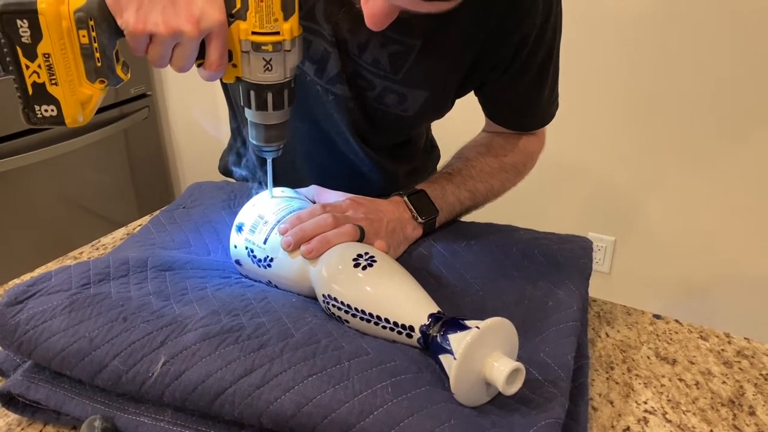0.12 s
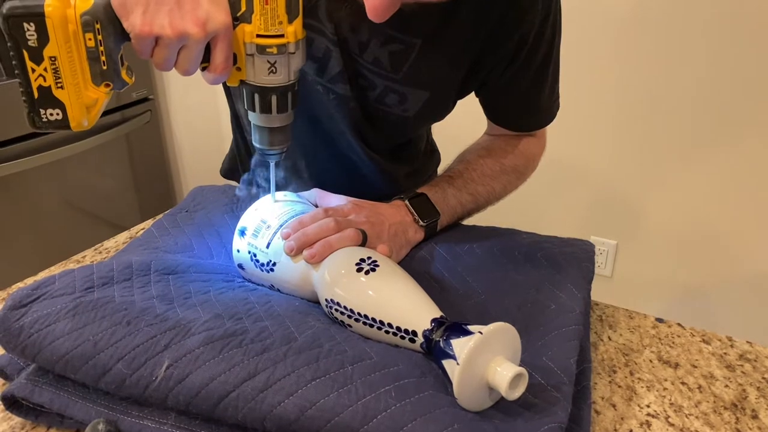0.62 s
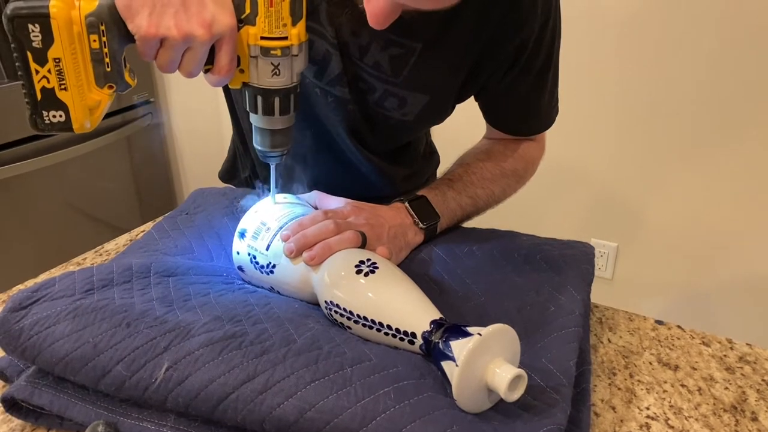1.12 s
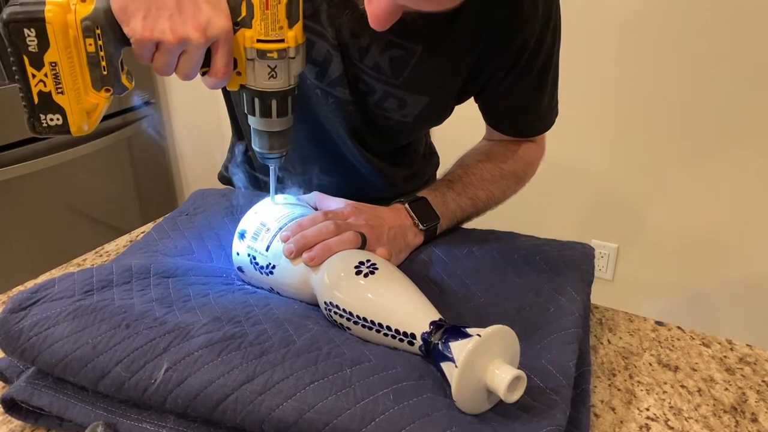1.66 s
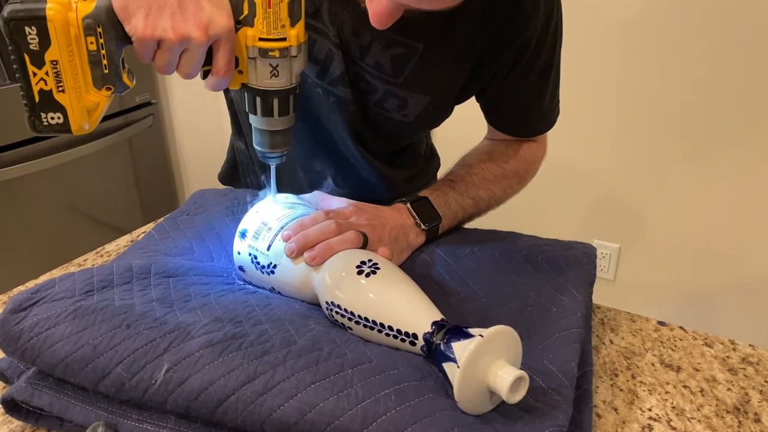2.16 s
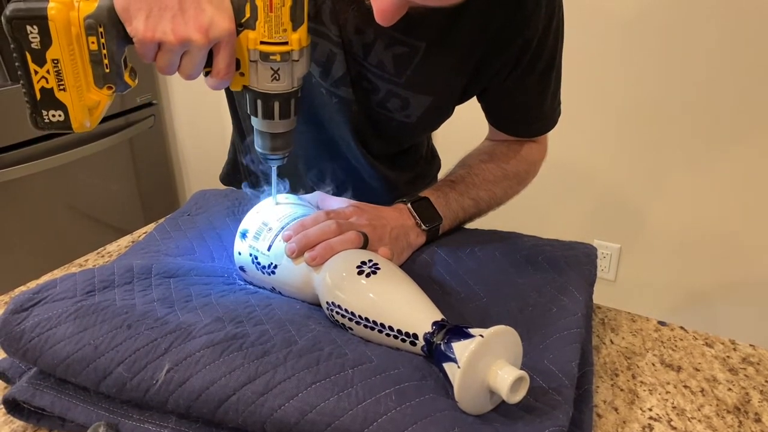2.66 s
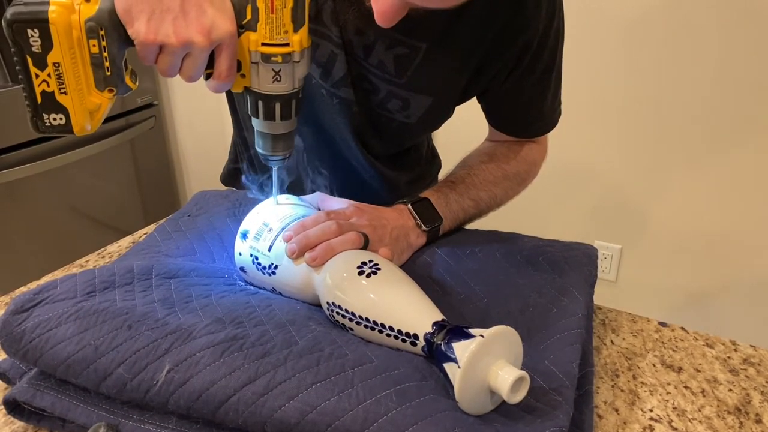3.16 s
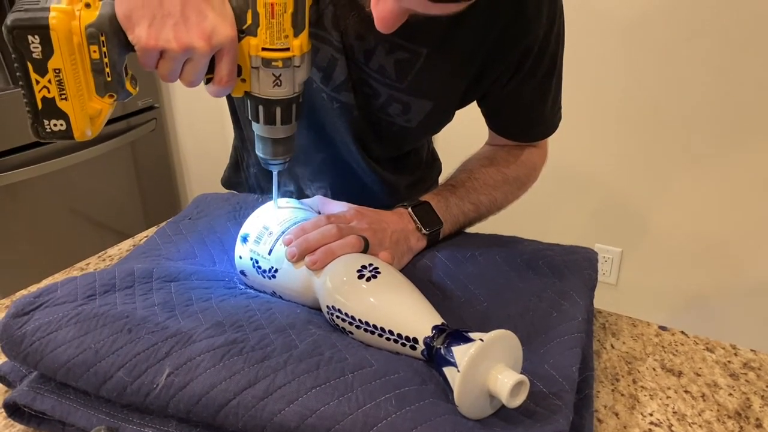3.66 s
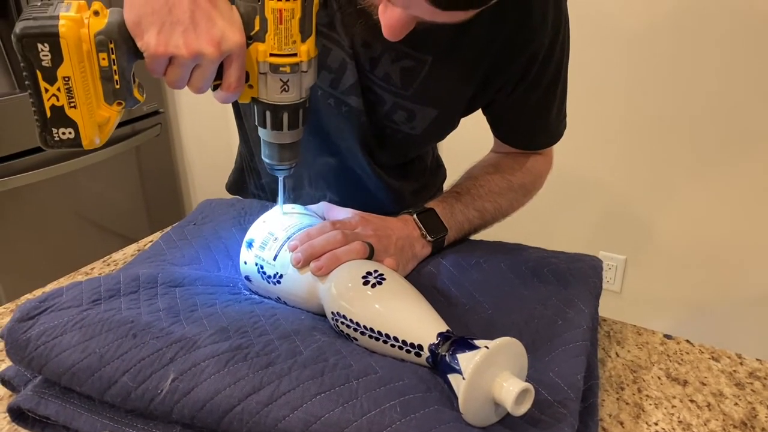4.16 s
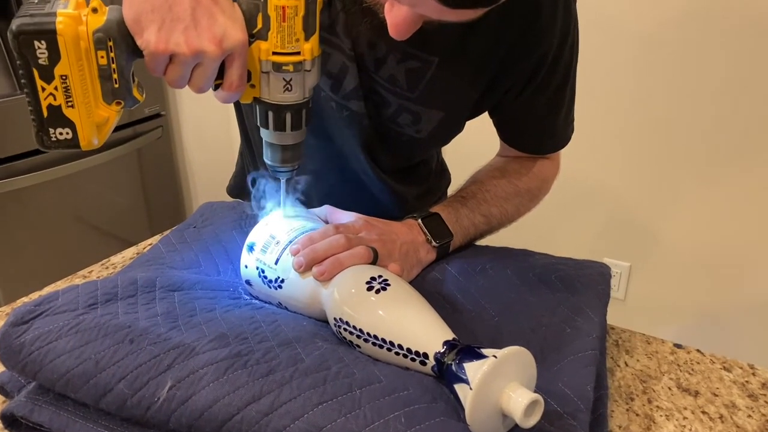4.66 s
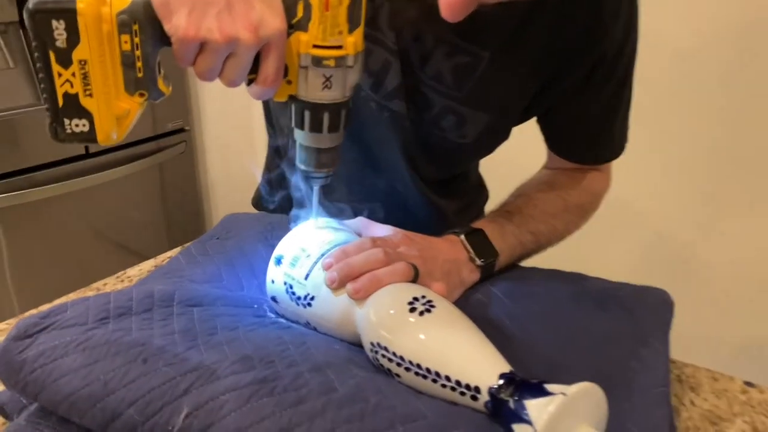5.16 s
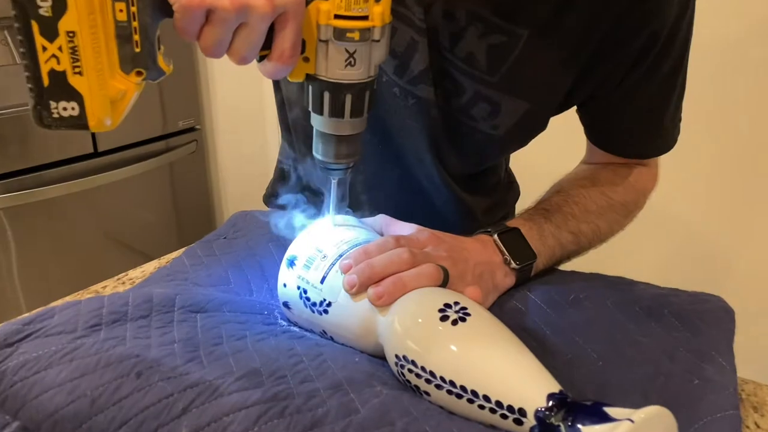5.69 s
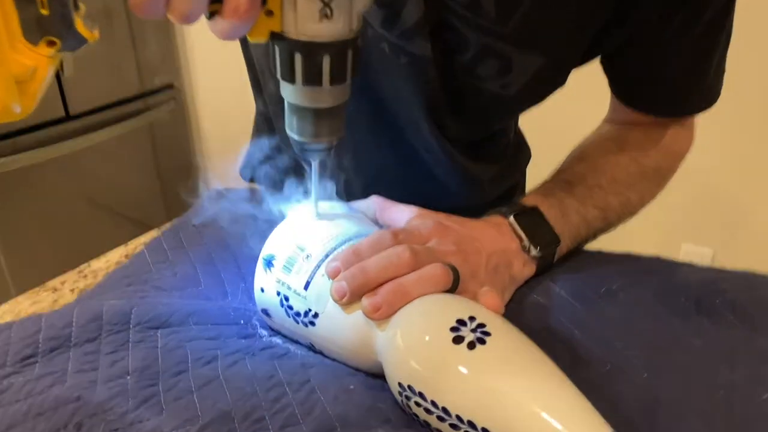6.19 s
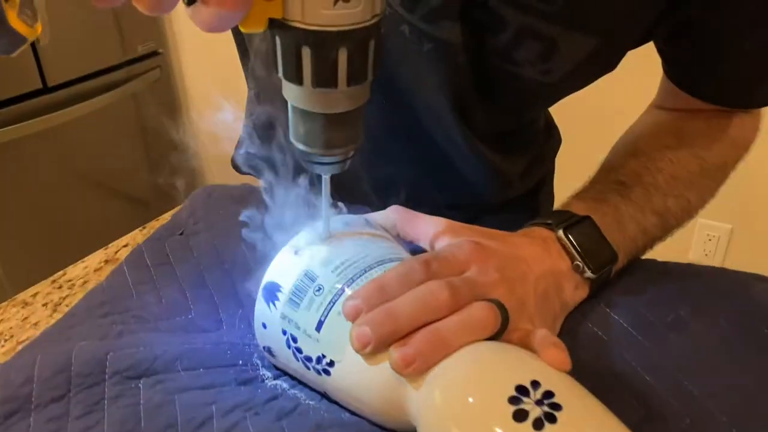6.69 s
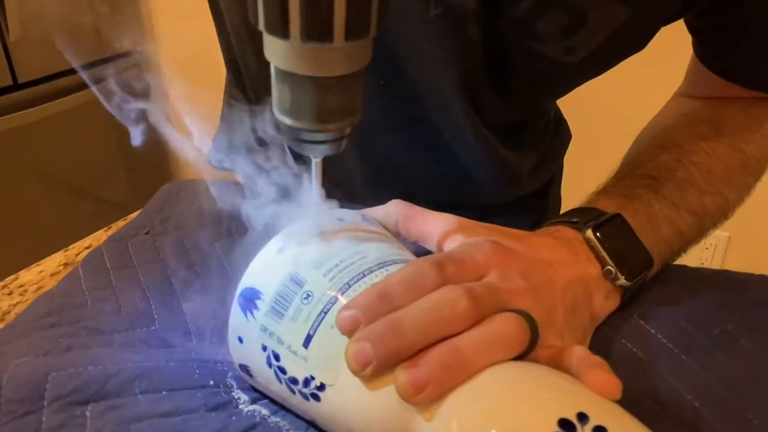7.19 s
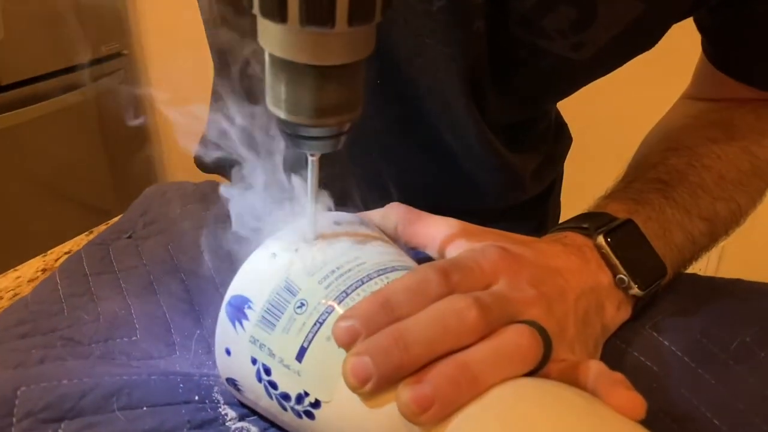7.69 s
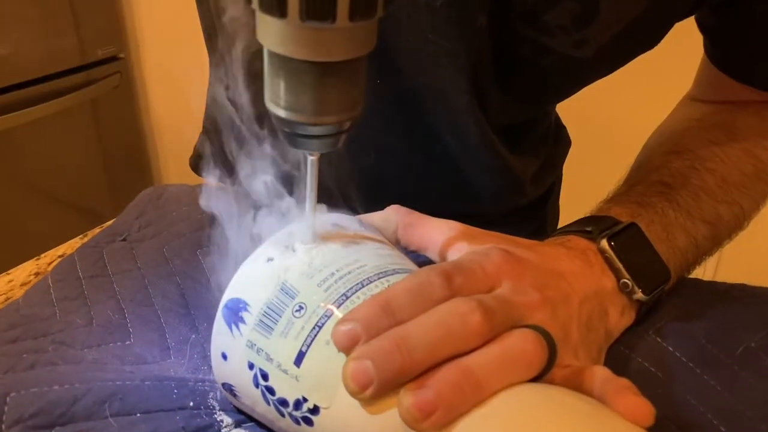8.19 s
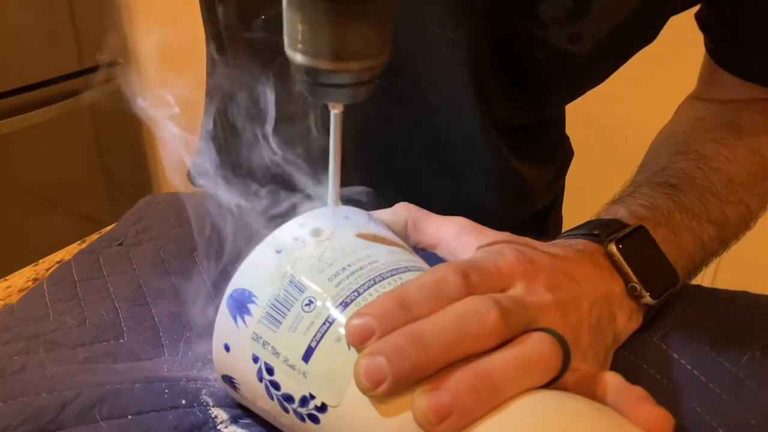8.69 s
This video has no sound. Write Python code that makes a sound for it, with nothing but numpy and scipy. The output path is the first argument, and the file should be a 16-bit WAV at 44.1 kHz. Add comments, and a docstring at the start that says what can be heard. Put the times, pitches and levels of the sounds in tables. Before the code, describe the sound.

A cordless drill grinds grittily into a ceramic bottle, its trigger pumped several times, then held in a harsher scraping hiss until it stops.

```python
"""A cordless drill grinds with a faint gear whine into a ceramic bottle on a folded blanket in a kitchen.
Its trigger is pumped a few times, held again and let go. Dense random clicks of grit are filtered into hiss
and drive resonances of shank, bottle, chuck jaws and gearbox; slower bumps thump into the blanket.
The motor is a set of unsteady sines; ticks and brake clacks are single blows that ring the same kind of modes.
Two microphone ports close by hear it all over the room tail and a quiet hush."""
import sys
import numpy as np
from scipy import signal
from scipy.fft import rfft, irfft
from scipy.io import wavfile
from scipy.ndimage import uniform_filter1d

SR = 44100
rng = np.random.default_rng(int(sys.argv[2]) if len(sys.argv) > 2 else 0)


def makeup_ratio(level_db):
    """Linear amplitude ratio for a level in decibels (20 dB per factor of ten)."""
    decades = np.asarray(level_db, float) / 20
    return 10 ** decades


def unload_wav(signal):
    """Save mono or channel-first audio to the path in sys.argv[1] as 16-bit WAV at rate SR, clipped to [-1, 1]."""
    wavfile.write(
        sys.argv[1],
        SR,
        np.round(np.clip(np.atleast_2d(signal).T, -1, 1) * 32767).astype(np.int16),
    )


N = 389403
T = np.arange(N) / SR


def evened(x):
    """Scales to rms 1."""
    return x / np.sqrt(np.mean(x ** 2) + 1e-20)


def columns(rows):
    """Turns every column after the first (seconds) into a curve over time."""
    s, *rest = np.transpose(rows)
    return [np.interp(T, s, c) for c in rest]


def coloured(x, points):
    """Filters x by a spectrum of (Hz, dB) points and scales the result to rms 1."""
    f, db = np.transpose(points)
    hz = np.fft.rfftfreq(x.shape[-1], 1 / SR)
    gain = makeup_ratio(np.interp(np.log(hz + 1), np.log(f), db))
    return evened(irfft(rfft(x) * gain, x.shape[-1]))


def ring(x, modes):
    """Each mode is a steep resonance (one pole, twice) driven by x and scaled to its own level."""
    out = np.zeros(N)
    for hz, width, db in modes:
        pole = np.exp((2j * np.pi * hz - np.pi * width) / SR)
        rung = signal.lfilter([1], np.poly([pole, pole]), x).real
        out += makeup_ratio(db) * evened(rung)
    return out


def wander(hz):
    """Slow random drift of rms 1: noise smoothed twice over 1/hz seconds."""
    size = int(SR / hz)
    once = uniform_filter1d(rng.standard_normal(N), size)
    return evened(uniform_filter1d(once, size))


# Spectrum of the quiet room. Each row: frequency in Hz, relative density in dB per Hz.
HUSH = [(60, -8), (115, -1.5), (187, -21.5), (305, -6.5), (705, -19), (15500, -52)]


def hush():
    """The quiet room: coloured noise, mostly alike at both ports."""
    common, left, right = rng.standard_normal((3, N))
    both = np.array([common + .5 * left, common + .5 * right])
    return makeup_ratio(-62) * coloured(both, HUSH)


# Room tail by frequency. Each row: frequency in Hz, decay time t60 in seconds, relative level in dB.
ROOM = [(300, .55, -1), (1500, .9, -3), (4000, .68, -5.5), (7500, .58, -9), (12000, .6, -14)]


def kitchen(x):
    """Room tail: taps of random sign, one in every 20 samples, decay at a rate set by their frequency."""
    taps, at = np.zeros(SR), np.arange(200, SR - 20, 20)
    taps[at + rng.integers(0, 20, len(at))] = rng.choice([-1., 1.], len(at))
    hz, t, z = signal.stft(taps, SR, nperseg=256)
    f, *rest = np.transpose(ROOM)
    t60, far_db = (np.interp(hz, f, c)[:, None] for c in rest)
    near = makeup_ratio(4.5 - 60 * t / 0.039)  # counter and wall close by answer first and die fast
    far = makeup_ratio(far_db - 60 * t / t60)
    tail = signal.istft(z * (far + near), SR, nperseg=256)[1]
    return makeup_ratio(-16) * signal.fftconvolve(x, tail / np.linalg.norm(tail))[:N]


# Stereo picture of the ports. Each row: frequency in Hz, likeness 0-1, left over right in dB.
PORTS = [(60, 1, -3), (354, 0.72, -2), (857, 0.66, 2), (1440, 0.43, 0.5), (2460, 0, 1), (3400, 0.56, 0.5),
         (6000, 0.12, 1.5), (7500, 0.87, 0), (8800, 0.8, 1.1), (10000, 0.97, -1.1), (12100, 0.96, 0.5),
         (16000, 0.7, -1)]
# Phase by which the right port leads. Each row: frequency in Hz, lead in radians.
LEAD = [(0, 0), (1000, -.55), (3550, -.85), (4500, -.3), (6300, 0), (8350, 3.14), (12100, 9.42),
        (16000, 15.7)]
# the ports oppose each other here until the microphone nears, and the place slides down as it comes
OPPOSED_HZ, OPPOSED_WIDTH_HZ, OPPOSED_RAD, OPPOSED_SLIDE_HZ = 3073, 198, -2.4, 900
# motor tones reach the ports nearly unscattered; the room tail comes from all sides
TONE_SCATTER, TAIL_SCATTER_RAD = 0.19, 0.29


def scatter_map(shape):
    """Random field of rms 1, smooth over 22 frames in time and 3 bins in frequency."""
    over_time = uniform_filter1d(rng.standard_normal(shape), 22, 1)
    return evened(uniform_filter1d(over_time, 3, 0))


def ports(grind, tones, tail):
    """The phase between the ports, scrambled by drifting scatter that weakens as the hand-held microphone nears."""
    hz, t, z = signal.stft(np.array([grind, tones, tail]), SR, nperseg=1024, noverlap=768)
    f, *rest = np.transpose(PORTS)
    likeness, balance_db = (np.interp(hz, f, c)[:, None] for c in rest)
    distance_share = np.interp(t, [4.5, 6.5], [1.05, .75])
    spread = np.sqrt(-2 * np.log(np.clip(likeness, .05, 1))) * distance_share
    phase, patch = scatter_map(z[0].shape), scatter_map(z[0].shape)

    far = np.interp(t, [5.6, 7.2], [1, 0])
    opposed_hz = OPPOSED_HZ - OPPOSED_SLIDE_HZ * (1 - far)
    opposed = np.exp(-((hz[:, None] - opposed_hz) / OPPOSED_WIDTH_HZ) ** 2) * np.sqrt(far)
    lead = np.interp(hz, *np.transpose(LEAD))[:, None] + OPPOSED_RAD * opposed

    side, heard = np.array([-.5, .5])[:, None, None], 0
    diffuse = spread + TAIL_SCATTER_RAD * np.minimum(hz / 6000, 1)[:, None]
    for part, scatter in zip(z, (spread, TONE_SCATTER * spread, diffuse)):
        turned = np.exp(1j * side * (lead + scatter * phase))
        heard = heard + part * turned * makeup_ratio(-side * (balance_db + 2.6 * scatter * patch))
    return signal.istft(heard, SR, nperseg=1024, noverlap=768)[1][:, :N]


# Chuck speed, held until the next row. Each row: start in seconds, speed in turns per second.
SPEED = [(0, 12.87), (2.1, 11.12), (4.6, 12.91), (5.5, 15.03)]


def chuck_angle():
    """Angle of the chuck in radians: its stepped speed summed over time."""
    s, speed = np.transpose(SPEED)
    first_turn = .94
    turns_per_s = speed[np.searchsorted(s, T, "right") - 1]
    return 2 * np.pi * (first_turn + np.cumsum(turns_per_s) / SR)


TURN = chuck_angle()

# How hard the bit is pushed. Each row: time in seconds, grinding gain in dB, blanket thump in dB over grinding.
PUSH = [(0, -31.5, -21), (1.4, -31, -14), (2.1, -30.5, -13), (2.25, -33.5, -13), (3, -32.5, -6),
        (3.55, -28, -6.5), (3.8, -30.5, -6.5), (4.1, -26.5, -6), (4.55, -30.5, -7.5), (4.88, -38, -9.5),
        (5.06, -30, -9), (5.3, -31, -7.5), (5.46, -28.5, -9), (6.9, -29.5, -9), (8.3, -31.5, -8)]
# The trigger is pumped. Each row: let go in seconds, pulled again in seconds, deepest dip in dB,
# jolt back at the pull in dB, spin-up in seconds.
PUMPS = [(2.199, 2.348, -20.5, 0, 0.065), (2.526, 2.636, -20, 1.5, 0.049), (2.833, 2.922, -20, 4.5, 0.061),
         (3.089, 3.184, -20, 12.5, 0.06), (3.357, 3.405, -21.5, 13, 0.12), (3.596, 3.642, -18, 7.5, 0.11),
         (3.871, 3.954, -22, 13.5, 0.052), (5.322, 5.369, -6, 2.5, 0.034)]


def load():
    """The push on the bit, cut by each let-go and climbing back after each pull: grinding dB, thump dB over it."""
    brake_s, thump_lag_db = 0.036, -7.5  # time constant of the sinking level; the thump returns late
    load_db, thump_db = columns(PUSH)
    for off, on, dip_db, jolt_db, spin_s in PUMPS:
        sinking = (T < on) * (1 - np.exp(-np.maximum(T - off, 0) / brake_s))
        behind = (T >= on) * np.clip(1 - (T - on) / spin_s, 0, 1)
        load_db = load_db + dip_db * sinking + (dip_db + jolt_db) * behind
        thump_db = thump_db + thump_lag_db * np.sqrt(behind)
    return uniform_filter1d(load_db, size=100), uniform_filter1d(thump_db, size=100)


def tone(rows, waver_hz, flutter_db):
    """A sine on a pitch curve, slightly unsteady in pitch and level, silent outside its rows."""
    hz, db, *wobble_hz = columns(rows)
    inside = uniform_filter1d(1. * (T >= rows[0][0]) * (T < rows[-1][0]), 800)
    pitch_hz = hz + sum(wobble_hz) * np.sin(TURN) + waver_hz * wander(84)
    cycles = np.cumsum(pitch_hz) / SR
    level = makeup_ratio(db + flutter_db * wander(30))
    return np.sqrt(2) * inside * level * np.sin(2 * np.pi * cycles)


# Motor whine at full trigger. Each row: time in seconds, gear mesh in Hz, level in dB, once-a-turn wobble in Hz.
WHINE = [(0, 3566, -34, 24), (.96, 3559, -33, 15), (1.0, 3525, -46, 10), (1.2, 3525, -43, 6),
         (1.3, 3548, -34.5, 9), (1.96, 3540, -36.5, 8), (2.08, 3530, -32, 9), (2.15, 3470, -42, 5)]
# Shaft tone of the last long pull. Each row: time in seconds, pitch in Hz, level in dB, once-a-turn wobble in Hz.
SHAFT = [(5.03, 1055, -42, 40), (5.2, 1050, -43.5, 36), (5.3, 1044, -51, 3), (8.3, 1030, -51, 2)]
# The bottle groans when pushed hard. Each row: time in seconds, pitch in Hz, level in dB.
GROAN = [(4.1, 1700, -39), (4.6, 1630, -54), (4.95, 1880, -47), (6.7, 1800, -50)]
# Speed control whistle. Each row: time in seconds, level in dB before the load scales it.
CONTROL = [(0, -50), (2.2, -43), (5.2, -41), (5.6, -58)]
# A falling squeak. Each row: time in seconds, pitch in Hz, level in dB.
SQUEAK = [(4.235, 4000, -42), (4.278, 3760, -26), (4.32, 3570, -28), (4.345, 3450, -40)]


def motor():
    """Sines for gear whine, shaft, groan and squeak, and a control whistle whose level follows the load."""
    load_db = load()[0]
    control_hz, mesh_per_shaft, shaft_db = 12398, 4, -50
    shaft = [(s, hz / mesh_per_shaft, shaft_db) for s, hz, *_ in WHINE]
    whine = tone(WHINE, 3.5, 1.5) + tone(shaft, 1.5, 1.4) + tone(SHAFT, 3, 2.5)
    groan = tone(GROAN, 45, 3)
    whistle = tone([(s, control_hz, db) for s, db in CONTROL], 8, 4)
    whistle = makeup_ratio(load_db - load_db.max() + 3) * whistle
    return whine + groan + whistle + tone(SQUEAK, 4, .8)


def struck(rows, modes, crack_db):
    """Single blows that ring a set of modes, with a short noise crack."""
    blows = np.zeros(N)
    s, db = np.transpose(rows)
    blows[np.round(s * SR).astype(int)] = makeup_ratio(db)
    crack = makeup_ratio(-60 * T[:400] / 0.017) * rng.standard_normal(400)
    rung = ring(blows, modes)
    rung = blows.max() * rung / abs(rung).max()
    return rung + makeup_ratio(crack_db) * signal.oaconvolve(blows, crack)[:N]


# Trigger and chuck ticks. Each row: time in seconds, blow level in dB.
TICKS = [(2.359, -35), (2.8035, -16), (3.1758, -25), (3.406, -17.5), (4.548, -18), (8.384, -37.5)]
# A chip breaks off the bottle wall. Each row: time in seconds, blow level in dB.
CHIP = [(7.716, -7.5)]
# The brake grips. Each row: time in seconds, blow level in dB.
CLACKS = [(2.197, -20), (2.533, -18.5), (2.827, -23), (3.354, -19), (3.6045, -10.5), (3.866, -15.5)]
# Housing modes rung by the brake. Each row: frequency in Hz, width in Hz, relative level in dB.
HOUSING = [(1010, 460, -7), (6500, 250, -3.5), (10400, 470, -3.5)]


def ticks():
    """Ticks ring the shank and the bottle, a chip rings the wall, the brake clacks in the housing."""
    clicks = struck(TICKS, SHANK + WALL + RIM, -2.7)
    return clicks + struck(CHIP, WALL, -20.5) + struck(CLACKS, HOUSING, -20)


def grit(per_s, spread_db, once_db, lag, throb_db, drift_db):
    """Dense clicks of crushed grains; the off-centre bit bites harder once a turn, and unevenly between."""
    uneven = sum(np.cos(k * TURN + 2 * np.pi * rng.random() + wander(1.5)) for k in (2, 3, 4))
    bite_db = once_db * np.cos(TURN + lag) + throb_db * uneven + drift_db * wander(27.0)
    size = makeup_ratio(spread_db * np.minimum(rng.exponential(1, N), 4)) * rng.choice([-1., 1.], N)
    clicks = size * (rng.random(N) < per_s / SR)
    return evened(clicks * makeup_ratio(bite_db))


# Hiss of the grit in a shallow and in a deep hole. Each row: frequency in Hz, relative density in dB per Hz.
SHALLOW = [(70, -32.5), (150, -5.5), (500, -6.5), (2200, -6.5), (3250, 3.5), (4100, -1.5), (4800, 1),
           (5900, -4.5), (6400, -2), (7500, -2), (9000, 1.5), (12500, 0.5), (14000, -7), (15700, -11)]
DEEP = [(70, -35.5), (150, -9.5), (500, -4), (2200, -4.5), (3200, 3), (4600, 1), (5200, -4), (5600, 2.5),
        (7500, -36.5), (9000, 3), (12500, 2), (14000, 2.5), (15700, 2)]


def grit_hiss(grains, depth):
    """Crushed grains hiss; the shallow colour gives way to the deep one at equal power."""
    deep_grains = grit(8000, 2.4, 0.72, .1, 1.0, 0.28)
    return np.sqrt(1 - depth) * coloured(grains, SHALLOW) + np.sqrt(depth) * coloured(deep_grains, DEEP)


# Low, belly and high mode of the bottle body. Each row: frequency in Hz, width in Hz, level in dB.
BODY = [(1084, 545, -13.5), (1660, 320, -14), (2851, 120, -19)]


def bottle_body(grains, pumped):
    """Grit rings the bottle body; its belly mode rings less while the trigger is pumped."""
    low, belly, high = (ring(grains, [mode]) for mode in BODY)
    return low + makeup_ratio(-3 * pumped) * belly + high


# Modes of shank, bottle wall, hole rim, scraped hole side and rattling gearbox, before any scaling by depth
# or whine. Each row: frequency in Hz, width in Hz, relative level in dB.
SHANK = [(11215, 45, -10), (11295, 90, -5), (11600, 520, -.5)]
WALL = [(624, 70, -23), (958, 5, -29), (7120, 140, -2), (7456, 65, -14), (3560, 210, -10), (13410, 170, -6),
        (14020, 240, -11)]
RIM = [(9945, 120, -9), (10142, 115, -3), (10380, 300, -7)]
SCRAPE = [(8200, 2460, 1.5), (14750, 1800, -16)]
GEARS = [(3590, 380, -10)]
# Ringing against hole depth. Each row: depth 0-1, shank gain in dB, wall gain in dB.
RINGS = [(0, 1.5, -19), (.15, 7.5, -10.5), (.5, -11, -8.5), (.85, -7, -2), (1, -9, 8)]


def grit_rings(depth, rim_db, pumped):
    """Separate streams of grit ring each family of modes, at gains set by depth, trigger and gear whine."""
    at, *levels = np.transpose(RINGS)
    shank_db, wall_db = (np.interp(depth, at, db) for db in levels)
    shank_db = shank_db - 10.5 * pumped  # the shank rings less while the trigger is pumped
    gears_db = -5 * (T < WHINE[-1][0])  # the gearbox rattles less while it whines cleanly
    rings = makeup_ratio(shank_db) * ring(grit(5000, 3, 3.2, 0, 1.4, 1.2), SHANK)
    rings += makeup_ratio(wall_db) * ring(grit(3000, 2.7, 0.78, 2.2, 2.1, 1.0), WALL)
    rings += makeup_ratio(rim_db) * ring(grit(4000, 4.6, 4.0, -0.11, 3.0, 1.0), RIM)
    rings += depth * ring(grit(6700, 2.4, 4.2, -.1, 0.4, .8), SCRAPE)  # the bit rubs the side of the deep hole
    rings += makeup_ratio(gears_db) * ring(grit(2500, 2.7, 0.89, .1, 1.2, 0.98), GEARS)
    return rings


# The bottle bounces under the hardest push. Each row: time in seconds, bounces per second.
CHATTER = [(3.98, 32.5), (4.28, 31), (4.37, 21.5), (4.57, 21)]
# Blanket modes before the depth tilt. Each row: frequency in Hz, width in Hz, relative level in dB.
PAD = [(122, 22.6, -7), (200.7, 82, -3), (257.6, 107, 0), (321, 59, -9.5)]


def blanket_thump(thump_db, depth):
    """Bumps of the bottle ring the blanket, which swallows the lowest push; the thump darkens with depth."""
    chatter_db, knock_db, weak_knock = 5.5, .5, .75  # weak_knock: share taken off every second knock
    sink_db, middle_hz = 5.5, 230  # tilt in dB per octave per unit of depth, about the middle
    bouncing = (T > CHATTER[0][0]) * (T < CHATTER[-1][0])
    bounces = np.cumsum(bouncing * columns(CHATTER)[0]) / SR
    bounce_db = -chatter_db * bouncing * np.cos(2 * np.pi * bounces)
    bumps = grit(600, 1.7, 0.45, 2.5, 1.76, 0.38) * makeup_ratio(bounce_db)

    halves = np.floor(TURN / np.pi)  # in the shallow hole the bit knocks evenly, twice a turn, strong and weak
    knocks = evened(np.diff(halves, prepend=halves[0]) * (1 - weak_knock * (halves % 2)))
    bumps = bumps + makeup_ratio(knock_db) * knocks * (T < PUMPS[0][0])

    thump = np.zeros(N)
    for mode in PAD:
        tilt_db = sink_db * (depth - .5) * np.log2(middle_hz / mode[0])
        thump += makeup_ratio(tilt_db) * ring(bumps, [mode])
    swallow = signal.butter(3, 105, "high", fs=SR, output="sos")
    return makeup_ratio(thump_db) * signal.sosfilt(swallow, thump)


# Progress of the hole. Each row: time in seconds, depth 0-1, rim gain in dB, chuck jaws gain in dB.
HOLE = [(0, 0.016, -25, -4), (2.1, 0.065, -3.5, 5), (3.3, 0.11, -1, 6.5), (4.6, 0.31, -4, 7),
        (5.6, 0.67, -1, 8.5), (6.1, 0.85, -15, -3), (6.5, 0.89, 6, 5), (7.4, 0.95, 0, 5),
        (8.3, 0.92, -0.5, 4.5)]
# The chuck jaws ring. Each row: frequency in Hz, width in Hz, relative level in dB.
JAWS = [(4469, 42, -22)]
# The counter top drones. Each row: frequency in Hz, width in Hz, relative level in dB.
COUNTER = [(57, 19, -31)]


def grinding():
    """Hiss, bottle body, rings, blanket thump and counter drone, all scaled by the load on the bit."""
    stop_s = 8.312  # the brake halts the chuck
    jaws_free = .35  # share of a drop in load that the jaws do not follow
    load_db, thump_db = load()
    depth, rim_db, jaws_db = columns(HOLE)
    pumped = uniform_filter1d(1. * (T > PUMPS[0][0]) * (T < PUMPS[-2][1]), size=4000)
    grains = grit(9000, 3.46, 0.038, .1, 0.34, 0.44)
    jaws_db = jaws_db + jaws_free * (load_db.max() - load_db)

    mix = makeup_ratio(5.5) * grit_hiss(grains, depth) + bottle_body(grains, pumped)
    mix += makeup_ratio(jaws_db) * ring(grains, JAWS)
    mix += grit_rings(depth, rim_db, pumped)
    mix += blanket_thump(thump_db, depth)
    mix += ring(rng.standard_normal(N), COUNTER)
    running = uniform_filter1d(1. * (T < stop_s), 500)
    return running * makeup_ratio(load_db) * mix


def scene():
    """Drill and bottle in the kitchen, heard at both ports."""
    grind, tones = grinding() + ticks(), motor()
    return ports(grind, tones, kitchen(grind + tones)) + hush()


def roll_off(x):
    """The treble ends steeply here."""
    return signal.sosfilt(signal.butter(12, 16080, fs=SR, output="sos"), x)


def record(dry):
    """The microphone drops the deepest bass below 38 Hz and the band ends sharply at 15740 Hz."""
    low_cut = signal.butter(3, 38, "high", fs=SR, output="sos")
    heard = signal.sosfilt(low_cut, dry)
    band_end = signal.firwin(1023, 15740, window=("kaiser", 9), fs=SR)
    heard = signal.oaconvolve(heard, band_end[None], "same")
    return roll_off(heard)


dry = scene()
out = record(dry)
unload_wav(out)
```